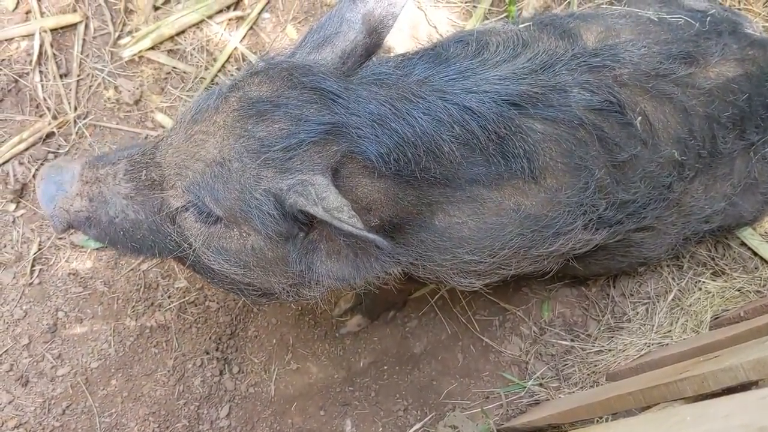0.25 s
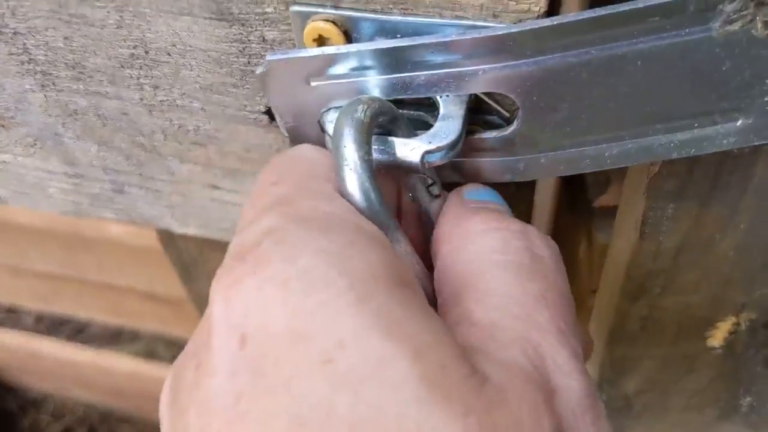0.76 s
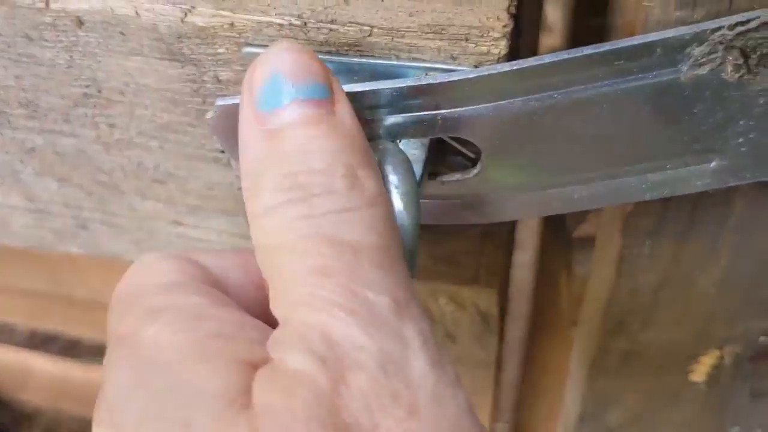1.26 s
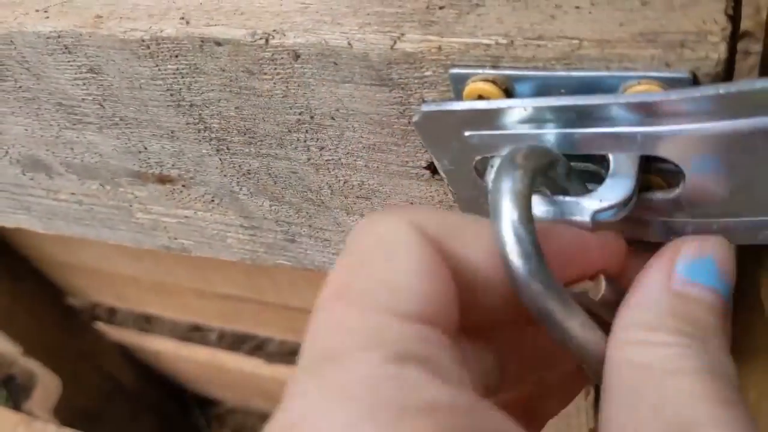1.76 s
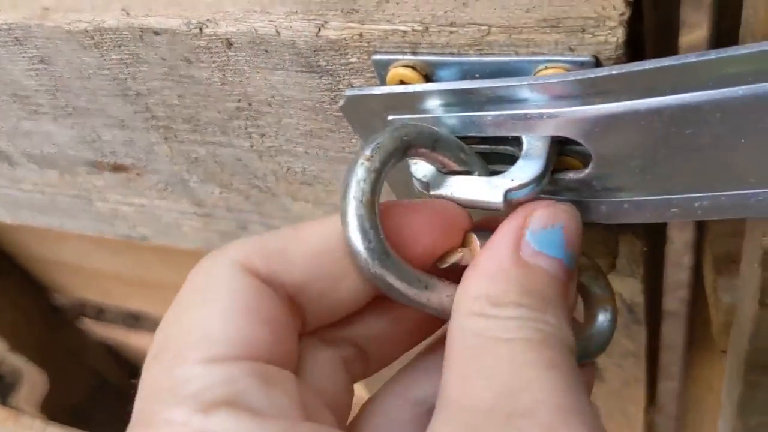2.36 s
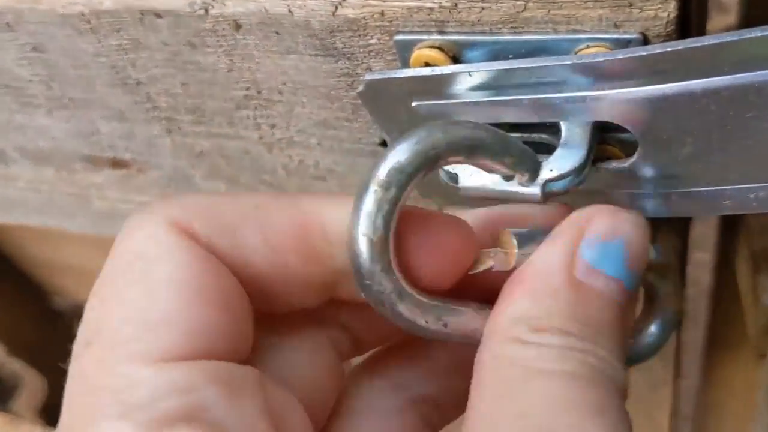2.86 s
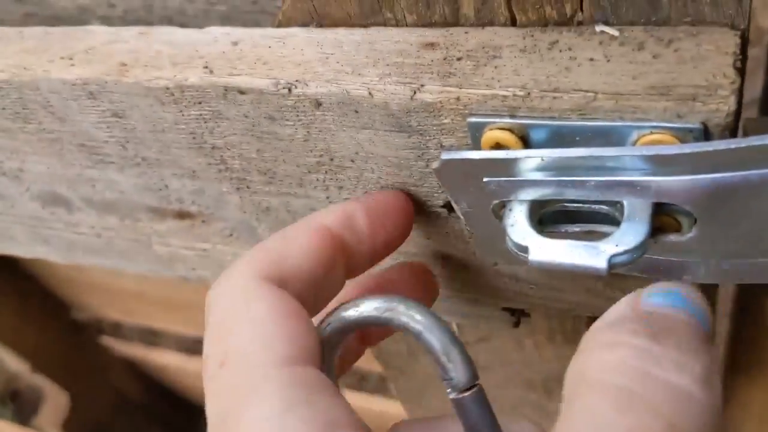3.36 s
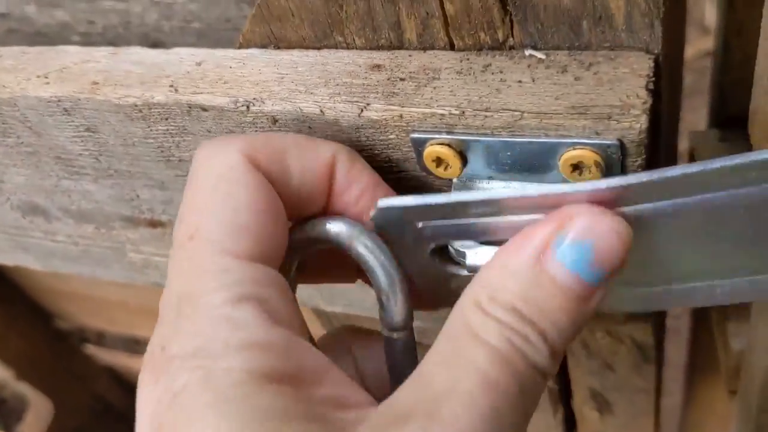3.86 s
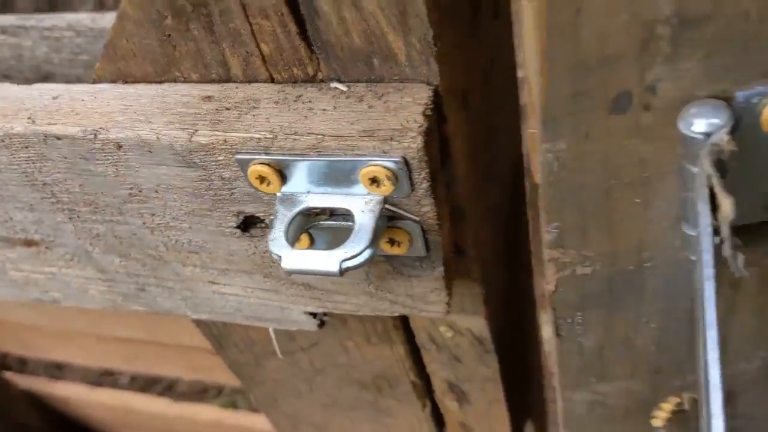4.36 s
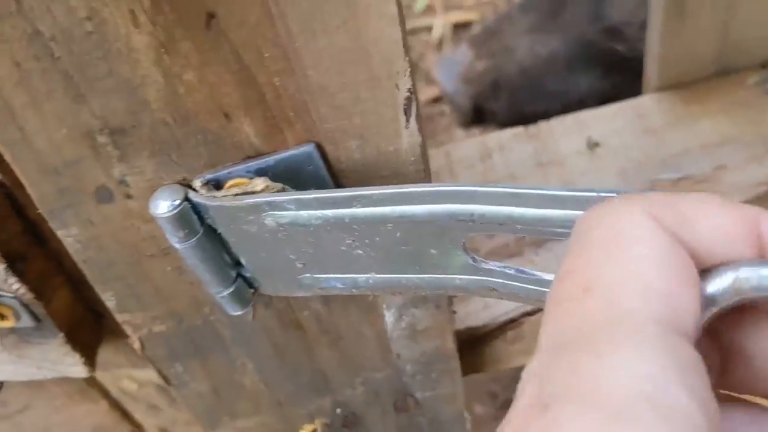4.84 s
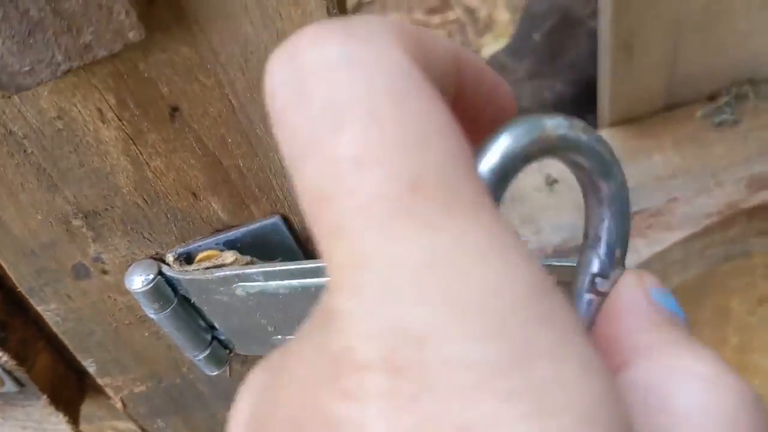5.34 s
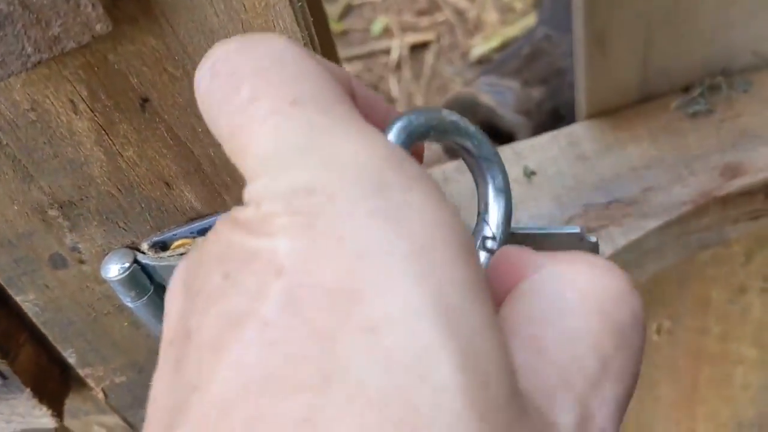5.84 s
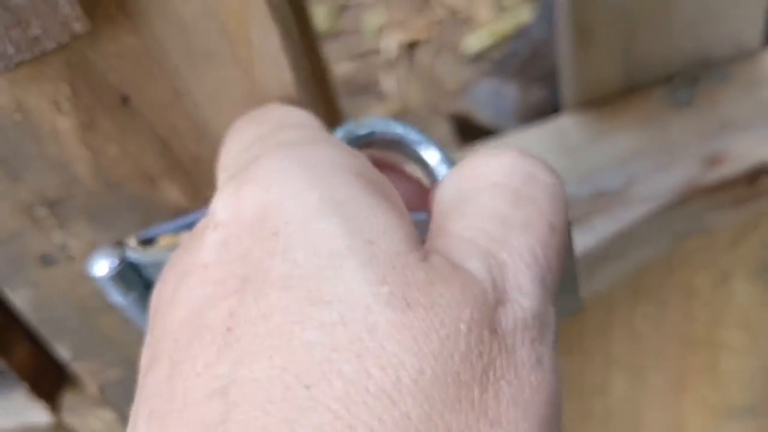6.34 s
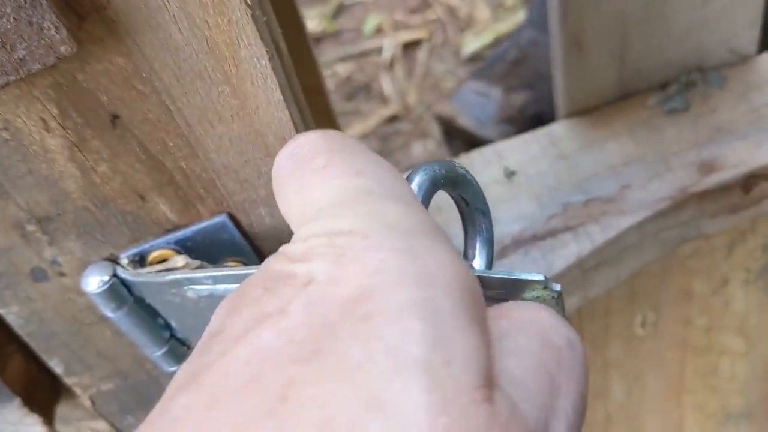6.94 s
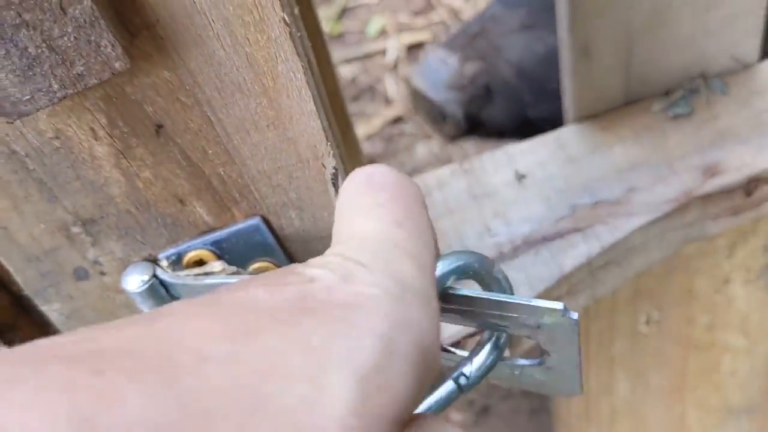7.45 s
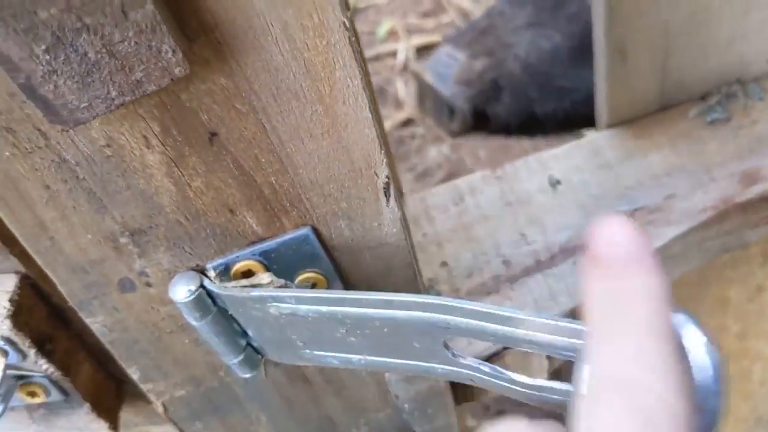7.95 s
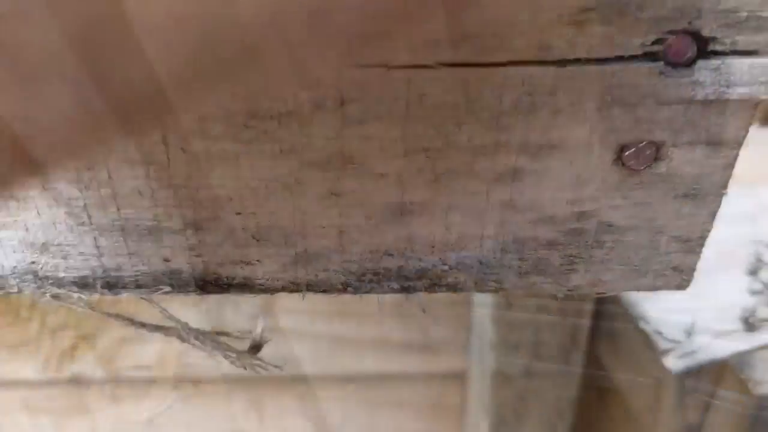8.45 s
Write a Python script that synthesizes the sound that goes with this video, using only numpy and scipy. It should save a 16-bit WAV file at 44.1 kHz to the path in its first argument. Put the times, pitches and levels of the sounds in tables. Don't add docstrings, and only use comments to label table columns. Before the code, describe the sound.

Faint airy pen ambience drops briefly to silence. Then, close up, a steel hook is worked out of a gate hasp with light scrapes and bright clanks, the plate swings open, the hook is threaded back and left jangling. Far engine hum, insect hiss and thin bird whistles sit behind. The latch stops abruptly and leaves rustle. Outdoor handheld stereo pickup, nearly dry.

```python
import sys
import numpy as np
from scipy import signal
from scipy.fft import rfft, irfft, next_fast_len
from scipy.io import wavfile
from scipy.ndimage import uniform_filter1d, map_coordinates

SR = 44100
rng = np.random.default_rng(int(sys.argv[2]) if len(sys.argv) > 2 else 0)


def rack_gain(trim_db):
    fader = np.asarray(trim_db, float)
    return 10 ** (fader / 20)


def pcm_store(signal):
    levels = np.round(np.clip(np.atleast_2d(signal), -1, 1) * 32767)
    wavfile.write(sys.argv[1], SR, levels.astype(np.int16).T)


N = 383776
LAST_CUT = 8.329

# hz, left_minus_right_db
YARD_SIDES = [(60, -0.5), (110, -6), (200, -2), (380, -4), (700, -1), (1290, 3.5), (2380, 5), (4400, 1),
              (8120, -9), (15000, -42)]
# hz, left_minus_right_db
PEN_SIDES = [(2400, 0.5), (8000, 4), (15000, -3)]


def unit(x):
    return x / np.sqrt(np.mean(x ** 2) + 1e-20)


def along(points, hz):
    f, v = np.transpose(points)
    return np.interp(np.log(hz + 1), np.log(f + 1), v)


def curves(rows):
    s, *cols = np.transpose(rows)
    return [np.interp(np.arange(N) / SR, s, c) for c in cols]


def wobble(rate):
    coarse = np.arange(0, N + 16, 16)
    knots = rng.standard_normal(int(N * rate / SR) + 4)
    return np.interp(np.arange(N), coarse, map_coordinates(knots, [coarse * rate / SR]))


def filtered(x, response):
    m = next_fast_len(x.shape[-1] + 8192)
    return irfft(rfft(x, m) * response(np.fft.rfftfreq(m, 1 / SR)), m)[..., :x.shape[-1]]


def ring(x, modes, lo_hz, hi_hz):
    def response(f):
        h = 0
        for k, (centre, width, db) in enumerate(modes):
            sign = (-1) ** k
            h = h + sign * rack_gain(db) * 1j * f * width / (centre * centre - f * f + 1j * f * width)
        low_skirt = 1j * f / (lo_hz + 1j * f)
        high_skirt = 1 / (1 - (f / hi_hz) ** 2 + 1j * np.sqrt(2) * f / hi_hz) ** 2
        h = h * low_skirt * high_skirt
        return h / np.sqrt(np.mean(abs(h) ** 2))
    return filtered(x, response)


def rush(spectrum, sides, patchy_db, count=N):
    # hz, correlation
    likeness = [(60, 1), (130, 1), (290, 0.72), (640, 0.74), (1410, -0.1), (3100, 0.19), (6820, -0.28),
                (15000, 0.32)]
    hz, _, (a, b) = signal.stft(rng.standard_normal((2, count)), SR, nperseg=2048)
    patches = uniform_filter1d(rng.standard_normal(a.shape), size=24, axis=0)
    patches = uniform_filter1d(patches, size=3, axis=1)
    turn = np.arccos(np.clip(along(likeness, hz), -1, 1))[:, None] / 2
    balance_db = np.minimum(np.outer([1, -1], along(sides, hz)), 0)
    share = rack_gain(along(spectrum, hz) + balance_db)[..., None]
    mid, side = a * np.cos(turn), b * np.sin(turn)
    bins = share * rack_gain(patchy_db * unit(patches)) * [mid + side, mid - side]
    both = signal.istft(bins, nperseg=2048)[1][:, :count]
    return both / np.std(both.mean(axis=0))


def echoes(x, t60, dull_hz):
    t = np.arange(SR // 3) / SR
    tail = rng.standard_normal((2, len(t))) * rack_gain(-60 * t / t60) * (t > .003)
    tail = filtered(tail / np.linalg.norm(tail[0]), lambda hz: 1 / (1 + 1j * hz / dull_hz))
    return signal.oaconvolve(x, tail, axes=1)[:, :N]


def pen():
    # hz, level_db
    pen_air = [(15, -37), (25, -13.5), (53, -1.5), (133, -20.5), (173, -12), (197, -21.5), (325, -25.5),
               (1850, -28), (2610, -18), (4500, -42), (5850, -59), (9900, -120)]
    # hz, level_db
    pen_hiss = [(2350, -17), (4000, -3), (4320, -3), (5510, -14), (7320, 1), (8440, -11), (10300, -1),
                (12700, -23), (13300, -2), (14100, -10), (16000, -14), (16500, -38)]
    air = rack_gain(-50) * rush(pen_air, PEN_SIDES, patchy_db=-2.0, count=SR // 2)
    hiss = rack_gain(-55) * rush(pen_hiss, PEN_SIDES, patchy_db=2.5, count=SR // 2)
    return np.pad(air + hiss, ((0, 0), (0, N - SR // 2)))


def engine():
    # time_s, pitch_hz, level_db
    exhaust = [(2.2, 120, -64.5), (3.2, 127, -60.5), (4.2, 133, -52), (5.4, 141, -46.5), (6.1, 146, -51.5),
               (6.35, 146, -72), (7.1, 142, -58), (8.3, 143, -55)]
    # pitch_hz, level_db
    last_lines = [(86.1, -58), (102.3, -55), (134.6, -50.5), (151, -50)]
    # time_s, level_db
    rumble_level = [(0.5, -59.5), (0.68, -59), (8.7, -51.5)]
    # hz, level_db
    rumble_colour = [(15, -60), (32, -38), (64, 4), (135, 0), (171, -2.5), (210, -7), (311, -23.5),
                     (450, -19), (580, -51), (990, -120)]
    t = np.arange(N) / SR
    top_hz, top_db = curves([(1.6, 118, -80)] + exhaust)
    hum = 0
    for hz, db in ((top_hz, top_db), (.622 * top_hz, top_db - 3.5)):
        phase = 2 * np.pi * np.cumsum(hz + 0.31 * wobble(6)) / SR
        hum = hum + np.sqrt(2) * rack_gain(db + 1.5 * wobble(5)) * np.sin(phase)
    last = 0
    for hz, db in last_lines:
        last = last + np.sqrt(2) * rack_gain(db + 2 * wobble(4.4)) * np.sin(2 * np.pi * hz * t)
    hum = np.where(t < LAST_CUT, hum, last)
    lumps = rack_gain(.8 * wobble(5))
    rumble_gain = rack_gain(curves(rumble_level)[0] - 2.5) * lumps
    rumble = rumble_gain * rush(rumble_colour, YARD_SIDES, patchy_db=0.7)
    return np.array([np.roll(hum, shift=45) * rack_gain(-0.6), hum]) + rumble


def yard_air():
    # hz, level_db
    air_colour = [(150, -28), (250, 0), (345, -4.5), (443, -14), (553, -3), (841, -9.5), (1430, -3.5),
                  (3950, -15.5), (4360, -13), (6260, -23.5), (7000, -26.5), (9100, -35), (15400, -120)]
    return rack_gain(-65 + 0.24 * wobble(1.8)) * rush(air_colour, YARD_SIDES, patchy_db=4.0)


def insects():
    # hz, level_db
    insect_colour = [(3530, -21), (6000, -20), (6960, -15), (7510, -18.5), (8420, -24.5), (10100, -2.5),
                     (10600, 0.5), (11700, -18.5), (15200, -21), (16000, -28), (16500, -32)]
    # hz, width_hz, level_db
    cricket_bands = [(7070, 510, -5.5), (13600, 150, 2.5), (15100, 260, -6)]
    hiss = rack_gain(-65 + 0.2 * wobble(3.22)) * rush(insect_colour, YARD_SIDES, patchy_db=0.9)
    crickets = ring(rng.standard_normal((2, N)), cricket_bands, lo_hz=5000, hi_hz=17000)
    return hiss + rack_gain([[-90], [-69.5]]) * crickets


def rubbing():
    # start_s, end_s, level_db
    strokes = [(0.496, 0.568, -36.5), (0.657, 1.324, -58), (1.288, 1.374, -36), (1.443, 1.476, -47),
               (1.73, 1.9, -52), (1.97, 2.095, -57), (2.28, 2.41, -42), (3.93, 4.072, -34.5),
               (4.1, 4.198, -41), (4.19, 4.46, -53), (4.44, 4.585, -46), (4.62, 4.9, -58), (6.27, 6.5, -56),
               (6.62, 6.73, -45), (6.765, 6.91, -46), (7.082, 7.31, -49), (7.46, 7.56, -39),
               (7.63, 7.76, -43.5), (7.8, 7.95, -32), (7.99, 8.11, -28.5), (7.93, 8.0, -40),
               (8.07, 8.135, -31), (8.2, 8.36, -33)]
    part_levels = [-6, -3, -11, -21]
    rub = np.zeros((4, N))
    for s, end, db in strokes:
        stroke = np.hanning(round((end - s) * SR)) ** 0.45
        rub[:, round(s * SR):][:, :len(stroke)] += rack_gain(db - 5.5 + np.array(part_levels)[:, None]) * stroke
    return rub * rack_gain([2.5 * wobble(45) for part in rub])


def contacts():
    # time_s, wood_db, plate_db, tip_db
    unhook = [(0.5146, -51.0, -30.0, -54.0), (0.5353, -39.5, -21.5, -50.5), (1.3193, -37.5, -23.5, -49.5),
              (1.3442, -31.5, -10.0, -33.0), (1.6143, -28.0, -13, -29), (1.6825, -29, -22, -45.5),
              (1.7979, -61.0, -40.0, -40.5), (2.0318, -25, -10, -27.0), (2.2675, -30, -20, -36),
              (2.2725, -34.5, -12, -26.0), (2.28, -30, -16, -16), (2.2845, -27.0, -15.0, -19),
              (2.7975, -24.5, -11, -30), (2.802, -30, -16, -19), (2.809, -25.0, -18.0, -25.5),
              (2.8217, -31.5, -24.0, -38.5), (2.93, -33, -24, -36), (2.9352, -25.5, -10.5, -19),
              (2.5667, -70, -60, -43), (3.0516, -70, -72, -49), (3.2289, -69.5, -66.5, -44.0),
              (3.2436, -65.5, -60, -13)]
    # time_s, wood_db, plate_db, tip_db
    rehook = [(3.9399, -28.0, -20.5, -38.0), (3.9436, -35.5, -10.5, -14.5), (3.9485, -32, -16, -22),
              (3.9625, -30, -24, -36), (3.969, -30.0, -16.5, -9.5), (4.0358, -37.0, -19.0, -43.0),
              (4.12, -50, -32, -55), (4.1293, -42, -23, -53.0), (4.5501, -53.5, -40, -38),
              (4.631, -42, -42.0, -61.5), (5.933, -33.5, -26.0, -46.5), (6.0225, -69.5, -49.0, -48.0),
              (6.0945, -33, -19, -19), (6.6441, -32.5, -19.0, -18.5), (6.665, -38, -32, -48),
              (6.6869, -38.0, -25.0, -41.0), (6.7785, -36.5, -25.5, -35.5), (6.811, -30.0, -26.0, -37.0),
              (6.8525, -31.0, -23.0, -33), (6.867, -45, -34, -36), (7.0985, -48, -26, -43.5)]
    # time_s, wood_db, plate_db, tip_db
    dangle = [(7.4638, -25.5, -11, -11.5), (7.4957, -44.0, -28, -34), (7.5071, -42.0, -23.5, -14.5),
              (7.8463, -33.5, -21, -46.0), (7.8654, -37, -26, -44), (7.9012, -26.5, -12.5, -21.5),
              (8.003, -39.5, -25.0, -33.0), (8.009, -33, -17, -26), (8.016, -29.5, -15, -25.5),
              (8.0268, -29.5, -15.5, -17.5), (8.0336, -27.5, -16.5, -21.0), (8.053, -35.5, -27.5, -27.0),
              (8.0643, -42.5, -18.0, -24.0), (8.133, -27.0, -8.5, -16.5), (8.142, -30, -19, -32),
              (8.159, -43.5, -21, -36.0), (8.187, -36, -22, -21), (8.1915, -25.5, -11, -19),
              (8.253, -32.5, -32.0, -53.5), (8.2804, -28.0, -17.5, -26.0), (8.2928, -23.0, -16.5, -29.5),
              (8.3054, -37.5, -19, -30.5), (8.3207, -24.0, -10.5, -27.0)]
    # time_s, plate_db
    nudges = [(0.7057, -35.5), (0.7397, -30.5), (0.9013, -37.5), (0.9897, -35), (1.1294, -27.0),
              (1.7639, -38.0), (1.9883, -22.0), (2.6344, -32.0), (2.869, -30), (4.1736, -36),
              (4.5186, -41.5), (6.3397, -45.5), (6.362, -43.0), (6.381, -47.0), (6.6004, -38.0),
              (6.9157, -37.5), (7.1616, -36.5), (7.2294, -24.0), (7.452, -36.0), (7.612, -38),
              (7.6533, -29.0), (7.8032, -30.0), (7.828, -31)]
    soft = [(s, db - 10, db, db - 27) for s, db in nudges]
    lead = 350
    t = np.arange(SR // 8) / SR
    force = np.zeros((4, N + len(t)))
    trim_db = np.array([2.2, .4, .7, 8])
    brief = np.array([1.45, 0.82, 0.54, 0.43])[:, None]
    rise_s = np.array([[.0019], [.0019], [.0018], [.0015]])
    scuff = rack_gain(np.linspace(-55, -28, lead)) * np.ones((4, 1))
    for s, wood_db, plate_db, tip_db in unhook + rehook + dangle + soft:
        hook_db = plate_db + .62 * (tip_db - plate_db) + 1.8
        t60 = .029 - .00045 * max(plate_db, tip_db)
        decay = rack_gain(-60 * t / (np.clip(t60, .004, .4) * brief))
        blow = (1 - np.exp(-t / rise_s)) ** 2 * decay
        blow += rack_gain(-28.5) * (t < .003)
        blow = np.hstack([scuff, blow])
        level = rack_gain(np.array([wood_db, plate_db, hook_db, tip_db]) + trim_db)
        force[:, round(s * SR) - lead:][:, :len(t) + lead] += level[:, None] * blow
    return force[:, :N]


def grit(spiky_db, own):
    common, left, right = rng.standard_normal((3, N))
    return unit(rack_gain(spiky_db * wobble(900)) * (common + own * np.array([left, right])))


def struck_notes():
    # time_s, pitch_hz, peak_db
    contact_notes = [(0.5388, 1360, -27.0), (0.7158, 1730, -30.0), (0.7436, 1410, -30.5),
                     (1.1324, 1690, -22.5), (1.3221, 1250, -24.0), (1.348, 1430, -12.0), (1.6165, 1510, -8),
                     (1.6178, 2920, -21.0), (1.6291, 1220, -25.5), (1.6845, 1430, -11.5), (1.993, 1470, -16.0),
                     (2.0335, 2800, -18.5), (2.0335, 2250, -5.5), (2.2745, 1410, -7.0), (2.2807, 4520, -11.0),
                     (2.2863, 1440, -6.5), (2.6376, 1310, -29.0), (2.8006, 1810, -2.0), (2.8034, 4080, -12.5),
                     (2.8113, 1400, -16.0), (2.8118, 4140, -19.5), (2.8237, 1710, -17.0), (2.9356, 4300, -8),
                     (2.9363, 3620, -17), (2.9371, 1410, -6.0), (2.9422, 1050, -14), (3.9456, 1380, -6.0),
                     (3.9477, 3820, -13.5), (3.9715, 1000, -25.5), (4.037, 2870, -27.5), (4.0421, 1710, -17.5),
                     (4.1335, 2210, -30.0),
                     (5.9348, 2160, -30.5), (5.9353, 3070, -30.0), (6.0955, 2110, -5.5), (6.0967, 2990, -12.5),
                  (6.6475, 3500, -27.0), (6.6459, 1640, -14.0), (6.6934, 1700, -19.0),
                  (6.7837, 1440, -15.5), (6.8175, 2080, -26.0), (6.8567, 5500, -29.5),
                  (6.8581, 1740, -20.0), (7.1021, 1720, -18.0), (7.2365, 1820, -23.0), (7.4665, 1670, -10),
                  (7.4683, 5320, -12.5), (7.472, 1950, -16.5), (7.5089, 5600, -11.0), (7.5114, 1700, -23.0),
                  (7.8519, 2240, -17.0), (7.8674, 1950, -20), (7.9023, 5370, -13.0), (7.9042, 1960, -7.5),
                  (8.0103, 2170, -10.0), (8.0133, 3640, -20.0), (8.0147, 5040, -23.5),
                  (8.0173, 1730, -10.5), (8.0275, 1750, -12.5), (8.0352, 5050, -14.0),
                  (8.0382, 2240, -12.0), (8.0541, 5350, -17.5), (8.0547, 1740, -21.0),
                  (8.0655, 5370, -14.0), (8.0666, 1820, -16.5), (8.133, 3980, -13.5), (8.1363, 2160, -9.5),
                  (8.1404, 1950, -12.0), (8.161, 5300, -19.0), (8.1647, 2160, -16.0), (8.1915, 5350, -10),
                  (8.1935, 2180, -7.5), (8.2832, 5260, -12.0), (8.2859, 2220, -15.0), (8.2934, 3480, -21.5),
                  (8.2974, 2190, -10.0), (8.3057, 5290, -21.5), (8.3067, 2210, -15), (8.3235, 5250, -19),
                  (8.3235, 2190, -1),
                     (0.538, 2150, -22.5), (1.318, 1900, -27.5), (1.3465, 2080, -9.5), (1.616, 1980, -11),
                   (1.991, 1900, -27.0), (2.2744, 1170.0, -19), (2.276, 1750, -15.5), (2.2807, 5370.0, -20),
                   (2.2863, 1170.0, -21), (2.2863, 1710.0, -18), (2.2863, 3340.0, -25),
                   (2.8006, 4880.0, -23), (2.8113, 5370.0, -22), (2.9356, 1170.0, -19),
                   (2.9356, 3030.0, -24), (2.9356, 5370.0, -19), (2.9365, 2150, -8), (3.9455, 2020, -8.0),
                   (3.9456, 5370.0, -21), (3.951, 1900, -12.0), (4.044, 1750, -18.0), (6.0955, 2510.0, -17),
                   (6.6456, 2070.0, -24), (7.468, 1300, -14.5), (7.8504, 1880.0, -22), (8.0275, 880.0, -24),
                   (8.1905, 3340.0, -24), (8.2974, 1290.0, -24)]
    out, t = np.zeros(N + SR), np.arange(SR // 16) / SR
    for s, hz, db in contact_notes:
        t60 = .019 * (hz / 2000) ** -.4
        swell = (1 - np.exp(-t / .0016)) * rack_gain(db + .6 - 60 * t / t60)
        out[round(s * SR):][:len(t)] += swell * np.sin(2 * np.pi * hz * t)
    return out[:N]


def birds():
    # start_s, end_s, from_hz, to_hz, level_db
    whistles = [(.68, 0.72, 4300, 2700, -55), (.77, .82, 3000, 3700, -61), (0.84, 0.975, 3650, 1800, -54),
                (1.865, 1.89, 2260, 2100, -51), (1.958, 1.99, 3700, 2750, -52),
                (2.11, 2.245, 3550, 1900, -53), (4.092, 4.118, 2500, 3500, -49),
                (4.17, 4.299, 3300, 2100, -49), (4.73, 4.8, 4150, 4250, -66), (4.89, 5.0, 5400, 5600, -67),
                (5.12, 5.17, 4200, 5300, -66), (5.17, 5.26, 5200, 5100, -68),
                (5.209, 5.404, 4410, 4300, -65), (5.445, 5.49, 4300, 5200, -66),
                (5.49, 5.56, 5250, 5200, -67), (5.518, 5.65, 4330, 4220, -63), (5.67, 5.8, 6150, 6050, -66),
                (6.93, 7.01, 3350, 3050, -61), (7.015, 7.045, 3500, 3000, -58),
                (7.05, 7.09, 3050, 2950, -61), (7.165, 7.305, 3600, 2000, -52)]
    out, waver = np.zeros(N), 75 * wobble(300)
    for s, end, from_hz, to_hz, db in whistles:
        n = round((end - s) * SR)
        pitch = np.linspace(from_hz, to_hz, n) + waver[round(s * SR):][:n]
        phase = 2 * np.pi * np.cumsum(pitch) / SR
        out[round(s * SR):][:n] += rack_gain(db) * np.hanning(n) ** .3 * np.sin(phase)
    pair = out * rack_gain([[2.5], [-2.5]])
    return pair + rack_gain(-1.8) * echoes(pair, t60=0.27, dull_hz=6000)


def creep(impacts):
    # start_s, end_s, level_db
    turns = [
        (.75, 1.33, -58.5),
        (4.63, 4.93, -61),
        (8.108, 8.135, -36),
    ]
    # hz, width_hz, level_db
    pin_modes = [(680, 200, -8), (2090, 110, 0)]
    push = np.zeros(N)
    for s, end, db in turns:
        stroke = np.hanning(round((end - s) * SR)) ** .3
        push[round(s * SR):][:len(stroke)] += rack_gain(db) * stroke
    return ring(impacts * push, pin_modes, lo_hz=300, hi_hz=4000)


def chimes():
    # time_s, pitch_hz, peak_db, t60_s
    knocks = [(3.246, 13950, -33, .1), (4.6275, 670, -30, .035), (6.654, 1050, -28, .06),
              (6.787, 1100, -29, .05), (6.816, 1030, -25, .06), (.902, 750, -38, .06),
              (1.133, 760, -33, .05), (4.512, 1720, -40, .08), (5.658, 1400, -31, .003),
              (5.6597, 235, -27, .035)]
    out, t = np.zeros(N + SR), np.arange(SR // 2) / SR
    for s, hz, db, t60 in knocks:
        swell = rack_gain(db - 60 * t / t60) * (1 - np.exp(-t * hz * 4))
        out[round(s * SR):][:len(t)] += swell * np.sin(2 * np.pi * hz * t)
    return out[:N]


def latch():
    # hz, width_hz, level_db
    hasp_shut = [(520, 310, -12), (743, 180, -5.5), (1080, 140, 1), (1328, 150, -1), (1710, 170, -1),
                 (2100, 120, -.5), (2460, 200, -7), (3100, 120, -5), (3700, 200, -5), (4096, 160, -3),
                 (4620, 80, -4), (5030, 230, -7), (6130, 310, -9.5), (7180, 340, -10), (10130, 490, -3),
                 (12800, 1400, -6), (15500, 220, -7.5), (3300, 3000, -14.5), (8350, 4000, -8)]
    # hz, width_hz, level_db
    hasp_held = [(680, 200, -9), (1080, 110, -4), (1340, 260, -5), (1660, 220, -3), (2110, 170, 0),
                 (2500, 300, -6), (3000, 300, -7), (3600, 250, -9), (4450, 220, -10), (5400, 600, -9),
                 (6200, 500, -12), (7930, 250, -19), (9960, 300, -16), (13100, 350, -14), (14000, 600, -12)]
    # hz, width_hz, level_db
    held_broad = [(480, 250, -23), (4300, 3000, -17), (9500, 6000, -19)]
    # hz, width_hz, level_db
    hasp_free = [(678, 35, -7), (1072, 67, 0), (1466, 370, -13), (2150, 150, -3), (3030, 75, -15.5),
                 (3650, 170, -2.5), (4300, 150, -25.5), (5330, 230, -3), (7060, 89, -17.5),
                 (8220, 92, -21.5), (8600, 240, -23), (10230, 190, -17.5), (13150, 240, -12),
                 (13300, 600, -17), (15300, 87, -12.5), (3400, 7200, -22), (8600, 7200, -23),
                 (420, 460, -22.5)]
    part_edges = [300, 1300, 2800, 6800, 21000]
    opened, let_go = 193000, 343000
    states = ((hasp_shut, slice(opened)),
              (hasp_held + held_broad, slice(opened, let_go)),
              (hasp_free, slice(let_go, N)))
    force = np.hypot(contacts(), rubbing())
    impacts = grit(spiky_db=3.6, own=.7)
    out = struck_notes() + chimes() + creep(impacts)
    for part, lo, hi in zip(force, part_edges, part_edges[1:]):
        for modes, when in states:
            part_modes = [m for m in modes if lo <= m[0] < hi]
            out[:, when] += ring((impacts * part)[:, when], part_modes, lo, hi)
    return out


def boards():
    # time_s, peak_db, pitch_hz
    thumps = [(1.621, -34, 170), (1.689, -30.5, 174), (2.271, -35, 377), (2.803, -31, 394),
              (2.849, -30, 126), (3.95, -29, 169), (3.969, -24, 121), (4.639, -28, 141.4),
              (4.897, -35, 220), (6.65, -39, 213), (7.473, -24.5, 113), (7.508, -27.5, 117),
              (8.291, -28.5, 207), (8.549, -28, 101)]
    out, t = np.zeros(N + SR), np.arange(SR // 3) / SR
    for s, db, hz in thumps:
        tone = np.sin(2 * np.pi * hz * t)
        tone += 0.24 * np.sin(2 * np.pi * 2.18 * hz * t)
        tone += .4 * rack_gain(-60 * t / 0.022) * np.sin(2 * np.pi * 4.5 * hz * t)
        out[round(s * SR):][:len(t)] += rack_gain(db - 60 * t / .057) * (1 - np.exp(-t / 0.0036)) * tone
    return out[:N]


def gust():
    # hz, level_db
    leaf_colour = [(1200, -3), (2000, -0.5), (3000, -6), (4200, -9), (7000, -26)]
    leaves = rush(leaf_colour, PEN_SIDES, patchy_db=2.5, count=SR // 2)
    swell_db = curves([(8.4, -70), (8.5, -55), (8.7, -53)])[0]
    return rack_gain(swell_db) * np.pad(leaves, ((0, 0), (N - SR // 2, 0)))


def at_ports(left, right):
    # hz, level_db
    shade = [(700, 2), (1400, .5), (2800, .6), (5600, 0), (8000, -17), (15000, -19)]
    # hz, lag_radians
    duct_lag = [(900, 0), (1250, 1), (1600, 1.4), (2000, 2.7), (2500, 2.4), (3600, 1.1), (5400, .6)]
    # time_s, left_minus_right_db
    hand_side = [(.5, 2), (2, 1), (3.2, -2), (4, 1.5), (6, -2), (7, -0.5), (8.7, 0.5)]

    def shaded(hz):
        return rack_gain(along(shade, hz)) * np.exp(-2j * np.pi * hz * 0.00018 - 1j * along(duct_lag, hz))
    lean_db = curves(hand_side)[0] / 2
    near = np.array([filtered(left, shaded) * rack_gain(lean_db), right * rack_gain(-lean_db)])
    return near + rack_gain(-11) * echoes(near, t60=0.11, dull_hz=3000)


def scene():
    # time_s, level_db
    fade = [
        (.36, -103),
        (.4, -36),
        (.45, 0.5),
        (.5, 5.5),
    ]
    t = np.arange(N) / SR
    hand = at_ports(*latch()) * (t < LAST_CUT)
    surroundings = engine() + yard_air() + insects() + gust()
    gate = (hand + boards() + surroundings) * rack_gain(curves(fade)[0])
    return np.where(t < .318, pen(), gate * (t > fade[0][0])) + birds()


def low_pass(x):
    return signal.sosfilt(signal.butter(12, 16990, fs=SR, output="sos"), x)


def record(dry):
    soft = dry / (1 + abs(dry / 1.05) ** 6) ** (1 / 6)
    top_edge = [(15700, 0), (16100, -16), (17000, -45), (18000, -100)]  # hz, level_db
    mix = filtered(soft, lambda hz: rack_gain(along(top_edge, hz)))
    return low_pass(mix)


dry = scene()
out = record(dry)
pcm_store(out)
```